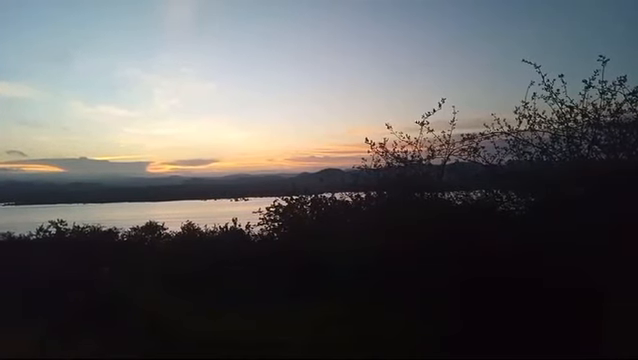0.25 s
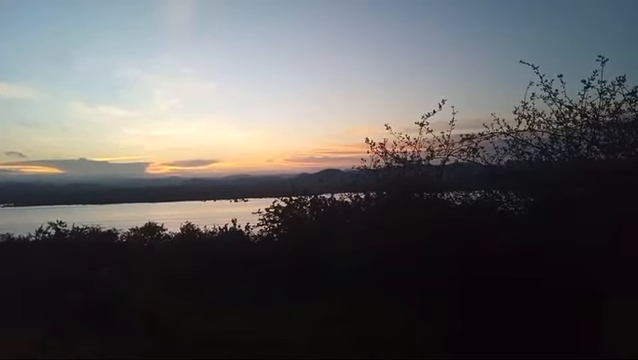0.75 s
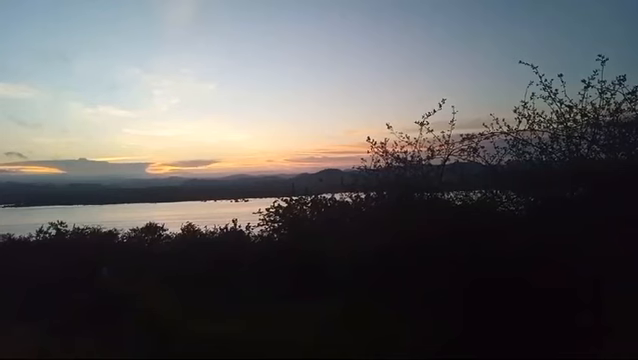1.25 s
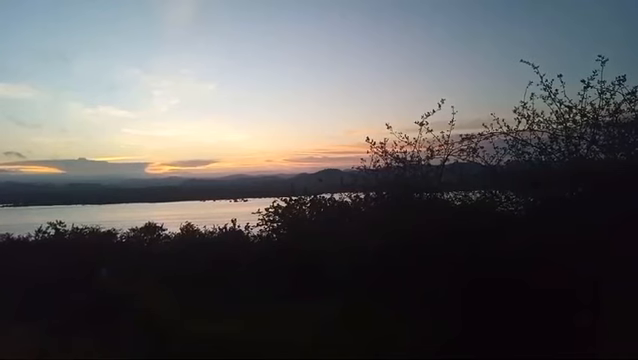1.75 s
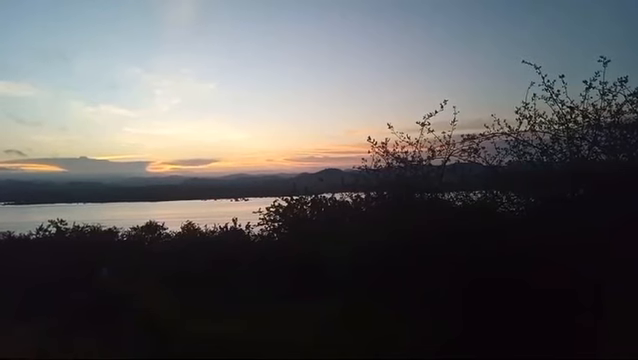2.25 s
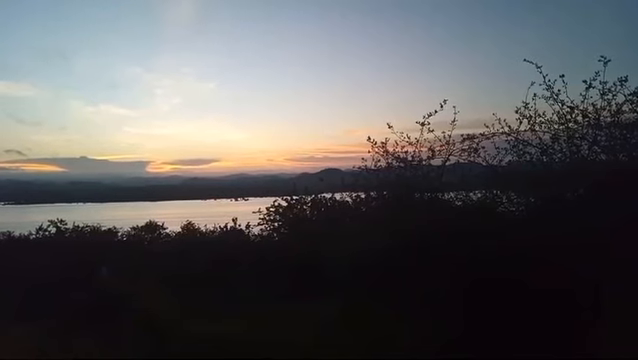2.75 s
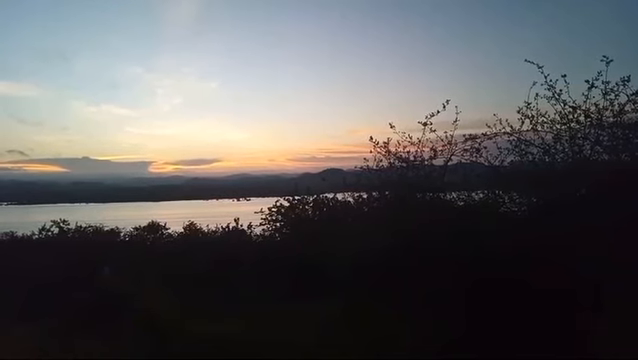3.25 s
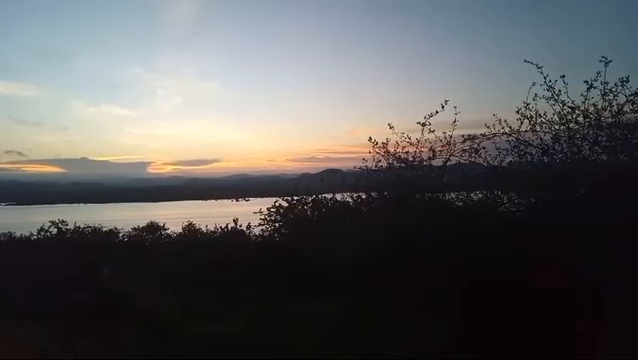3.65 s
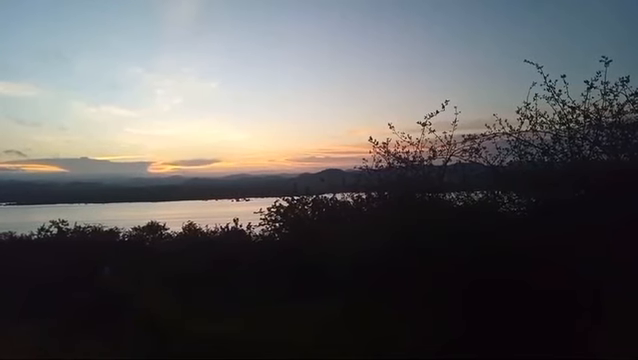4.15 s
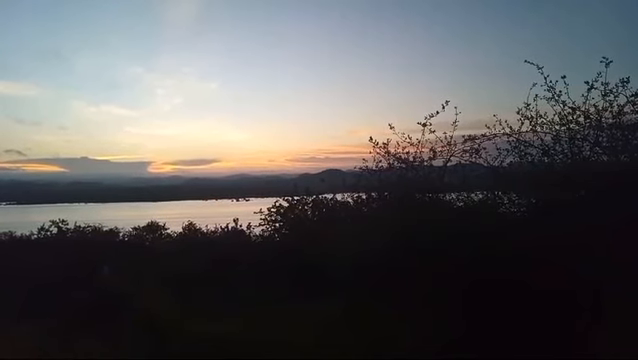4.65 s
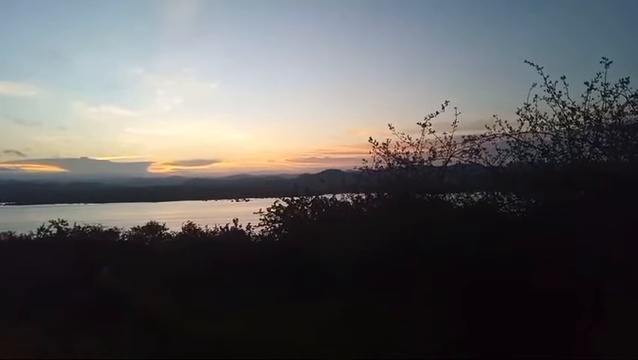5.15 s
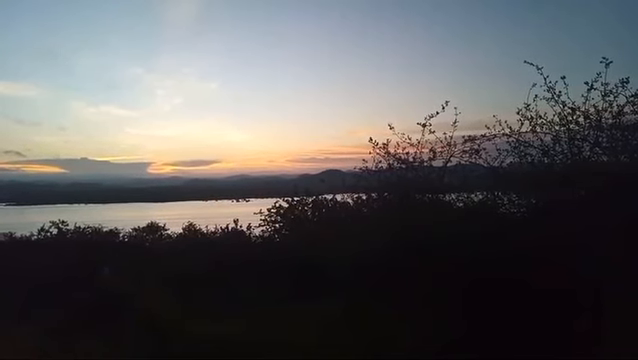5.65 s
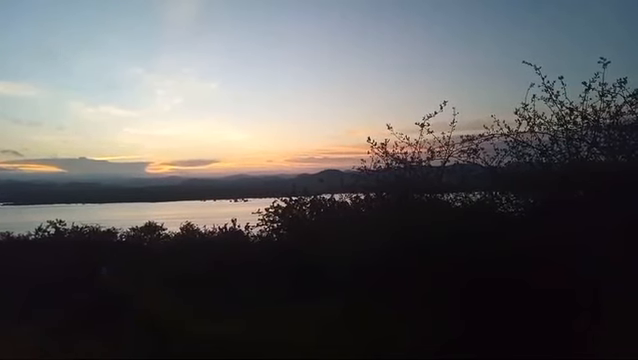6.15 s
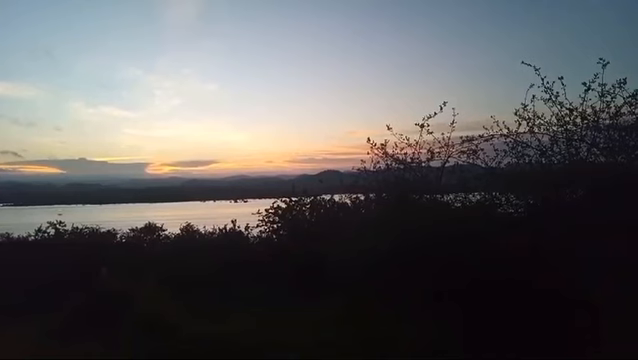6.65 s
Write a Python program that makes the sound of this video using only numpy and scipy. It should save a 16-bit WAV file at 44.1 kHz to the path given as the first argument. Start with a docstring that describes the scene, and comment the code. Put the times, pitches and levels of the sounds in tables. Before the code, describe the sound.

A busy but spacious bird chorus: close liquid whistles, bright rising chirps from bushes, thin high peeps and dry ticks over a faint distant twitter. Early on, a rooster crows roughly, then smoothly downward; another replies very far off around three seconds. Bird phrases continue, growing sparser and quieter toward the end, where a barely audible low hum drifts in. Mono open-air sound with woodland scatter, quiet rumble and small handling bumps.

```python
"""Dawn chorus above a lake: a songbird warbles close by; bush birds answer with slurred whistles and sharp ticks.
A rooster crows, hoarse bursts giving way to a clean falling note; a second one answers from far away.
Birds are gliding sines, roosters summed harmonics, the hoarse one with pulsed noise; trees scatter every call.
Under them lie a faint twitter, rumble and hiss, a thin low hum, puffs of air and soft bumps on the microphone."""
import sys
import numpy as np
from scipy import signal
from scipy.fft import rfft, irfft, next_fast_len
from scipy.io import wavfile
from scipy.ndimage import map_coordinates

SR = 44100
rng = np.random.default_rng(int(sys.argv[2]) if len(sys.argv) > 2 else 0)


def unload_audio(sound):
    """Save the sound as a 16-bit wav file, at the path given as the first command line argument."""
    columns = np.transpose(np.atleast_2d(sound))
    # keep every value between -1 and 1, then stretch to whole-number steps
    steps = np.round(np.clip(columns, -1, 1) * 32767)
    wavfile.write(sys.argv[1], SR, steps.astype(np.int16))


N = 304731
TOP_HZ = 15750  # band limit

# warbler's free song: (time [s], syllable, length [s], reference pitch [Hz], reference level [dB], overtone rms [dB])
WARBLER_SONG = [(0.0, "sag", 0.025, 2900, -33, -64), (0.004, "fall", 0.048, 2510, -40, -68),
                (0.852, "droop", 0.031, 2918, -36, -69), (0.875, "sag", .11, 2233, -42.5, -67.5),
                (1.472, "rise", .05, 2087, -43, -86.5), (1.523, "scoop", 0.055, 3073, -39.5, -84),
                (1.655, "wave", .078, 3408, -35, -73.5), (1.688, "arch", 0.028, 2427, -44, -77),
                (1.724, "arch", .035, 2470, -40, -74), (1.735, "rise", .054, 3435, -32, -67.5),
                (1.769, "rise", 0.041, 3850, -41, -57), (1.786, "droop", .035, 6400, -46, -65),
                (1.835, "rise", .036, 4690, -41, -59), (1.853, "swell", .02, 2900, -40, -64.5),
                (2.456, "sag", 0.021, 5030, -43, -81), (2.483, "flat", 0.033, 2070, -48.5, -93),
                (2.53, "swell", 0.087, 1612, -35, -65), (2.621, "arch", 0.039, 2450, -35, -63),
                (2.647, "bow", 0.061, 2616, -37.5, -72.5), (3.285, "wave", 0.036, 3305, -42, -80.5),
                (3.314, "wave", 0.038, 3317, -35.5, -68.5), (3.343, "arch", .034, 3880, -35.5, -63),
                (3.375, "fall", 0.16, 3327, -37, -63.5), (3.541, "arch", 0.023, 2477, -48.5, -106),
                (4.243, "droop", .049, 5380, -28, -51.5), (4.291, "fall", 0.081, 3780, -36, -62),
                (4.404, "sag", 0.094, 2250, -63.5, -98), (5.096, "plunge", 0.061, 3277, -37, -66.5),
                (5.194, "bow", .173, 2811, -34.5, -67), (5.419, "flat", 0.039, 2376, -52.5, -95),
                (5.467, "sag", 0.024, 2622, -46, -94), (6.213, "arch", 0.041, 2093, -48.5, -94),
                (6.267, "arch", 0.035, 2078, -49, -94), (6.352, "flat", 0.024, 2232, -42, -98),
                (6.382, "sag", 0.063, 1960, -68.5, -99)]
# warbler's refrain: (delay [s], syllable, length [s], reference pitch [Hz])
REFRAIN_NOTES = [(0, "bow", .145, 2482), (.248, "sag", 0.029, 2568), (.284, "arch", .048, 2290),
                 (.376, "plateau", .145, 2111)]
# refrain entries: (time [s], pitch factor, reference level [dB] of each of four notes)
REFRAIN_ENTRIES = [(1.803, 1.03, -47, -42.5, -40.5, -50), (3.612, .975, -51, -59, -53.5, -53.5),
                   (5.537, 1.005, -46, -43.5, -44, -50.5)]
# colour of the warbler's overtones: (frequency [Hz], gain [dB])
BEAK_GAIN = [(3500, -9), (6000, -7.5), (7500, -14), (9000, -4.5), (10700, 4), (13000, -10.5), (15500, -3)]
REFRAIN_OVERTONES_DB = -93


def warbler(fade_s):
    """Pure whistle and, separately, the flickering overtones that a hard-driven syrinx adds."""
    pure, bright = np.zeros(N), np.zeros(N)
    song = [(note(*row), overtone_db) for *row, overtone_db in WARBLER_SONG]
    song += [(sung, REFRAIN_OVERTONES_DB) for sung in phrases(REFRAIN_NOTES, REFRAIN_ENTRIES)]
    for (start_s, length_s, pitches_hz, levels_db), overtone_db in song:
        hz, phase, gain = voiced(length_s, pitches_hz, levels_db, waver=0.012, flutter_db=3.0, fade_s=fade_s)
        overtones = np.zeros(len(hz))
        for k in range(2, 8):
            flicker_db = 5 * wobble(130, size=len(hz))
            colour = amp(along(BEAK_GAIN, k * hz) + flicker_db)
            overtones += colour * (k * hz < TOP_HZ) * np.sin(k * phase)
        add(pure, start_s - fade_s / 2, gain * np.sin(phase))
        add(bright, start_s - fade_s / 2, amp(overtone_db) * unit(np.sqrt(gain) * overtones))
    opening = np.clip(np.arange(N) / SR / .006, 0, 1)  # 6 ms fade-in
    return pure * opening, bright * opening


# bush whistles: (time [s], syllable, length [s], reference pitch [Hz], reference level [dB])
BUSH_WHISTLES = [(0.165, "flat", 0.15, 3530, -75), (1.854, "flat", 0.067, 4670, -44.5),
                 (1.89, "sag", .051, 3880, -59), (1.983, "bow", 0.067, 3730, -52),
                 (2.063, "climb", 0.085, 5794, -45), (2.125, "bow", 0.088, 3784, -54),
                 (2.214, "climb", 0.084, 5750, -39.5), (2.254, "arch", 0.085, 3620, -54),
                 (2.425, "sag", 0.021, 3600, -65), (2.376, "climb", 0.081, 5760, -40.5),
                 (2.482, "arch", .04, 4720, -44.5), (2.534, "climb", .073, 5660, -47.5),
                 (2.564, "arch", 0.077, 3390, -56), (2.657, "sag", .045, 4220, -50.5),
                 (2.679, "flat", 0.039, 4810, -51), (2.742, "lift", 0.025, 5100, -54),
                 (2.944, "lift", .027, 5280, -51.5), (3.303, "arch", .09, 2530, -57.5),
                 (3.523, "droop", 0.026, 4640, -42), (3.551, "flat", 0.017, 3900, -45),
                 (3.569, "droop", 0.043, 4230, -48), (4.032, "flat", 0.19, 3400, -65),
                 (4.122, "lift", 0.065, 5090, -55.5), (4.199, "lift", 0.045, 5750, -50),
                 (4.205, "droop", 0.031, 3290, -58.5), (4.784, "flat", .08, 2320, -72.5),
                 (5.026, "sag", 0.041, 2290, -69), (6.15, "droop", 0.02, 3380, -54.5),
                 (6.405, "droop", 0.038, 2930, -80), (6.798, "arch", 0.097, 3030, -74)]
# two short notes and a long slur: (delay [s], syllable, length [s], reference pitch [Hz])
BUSH_CALL = [(0, "lift", .044, 2925), (.035, "droop", .042, 3807), (.156, "slur", .153, 5290)]
# call entries: (time [s], pitch factor, reference level [dB] of each of three notes)
BUSH_CALL_ENTRIES = [(1.195, 0.96, -60, -53, -40.5), (2.891, 0.98, -51.5, -44.5, -33),
                     (4.897, 0.99, -50, -45, -37.5), (5.412, .972, -51, -47.5, -38)]


def bush_birds():
    """Gliding whistles with a trace of octave, reflected by nearby surfaces."""
    answers = phrases(BUSH_CALL, BUSH_CALL_ENTRIES) + [note(*row) for row in BUSH_WHISTLES]
    calls = whistles(answers, octave_db=-51, waver=0.0065, flutter_db=2.5, fade_s=0.014)
    return echoed(calls, first_db=-20.5, second_db=-25)


# very high whistles: (time [s], syllable, length [s], reference pitch [Hz], reference level [dB])
THIN_WHISTLES = [(0.889, "bend", .12, 7520, -47), (3.894, "lift", 0.017, 7450, -58),
                 (4.173, "arch", 0.11, 7270, -49), (4.259, "lift", 0.11, 7220, -45)]


def thin_birds():
    """Very high glides with a stronger octave."""
    notes = [note(*row) for row in THIN_WHISTLES]
    return whistles(notes, octave_db=-14.5, waver=0.0049, flutter_db=-0.5, fade_s=0.011)


# fast downward sweeps: (time [s], length [s], nominal top pitch [Hz], reference level [dB])
TICK_SWEEPS = [(1.131, 0.018, 5810, -54.5), (1.643, 0.0095, 5950, -46), (2.832, .013, 5900, -43.5),
               (3.742, .013, 6050, -60.5), (3.764, 0.016, 6200, -57), (3.794, 0.012, 6250, -54.5),
               (3.971, .028, 9190, -66), (4.545, 0.03, 9430, -70.5), (4.845, 0.0086, 6150, -44.5),
               (5.348, 0.01, 6060, -49)]
TICK_FALL = 0.669  # last pitch / first pitch


def ticks():
    """Ragged sweeps, so fast that they sound like chips; each swells, then fades as it falls."""
    out = np.zeros(N)
    for start_s, length_s, top_hz, db in TICK_SWEEPS:
        hz, gain = syllable(length_s, [top_hz, top_hz * TICK_FALL], [db - 3, db + 3, db - 7], fade_s=.006)
        ragged = 1 + .035 * wobble(700, size=len(hz))
        add(out, start_s, gain * np.sin(turning(hz * ragged)))
    return out


# crow: (time [s], mean pitch [Hz], hoarseness [0 clean, about 1 hoarse])
CROW_PITCH = [(.3, 656.5, 1.08), (.4, 635.5, 0.56), (.53, 571, 0.65), (.585, 682.2, 0.36), (.65, 753, 0.03),
              (.72, 637.4, 0.52), (.78, 638, 0.82), (.84, 706, 0.22), (1.0, 689.2, 0.17),
              (1.06, 666.6, 0.63), (1.21, 639.8, 0.88), (1.28, 658.3, .14), (1.48, 702.7, 0.02),
              (1.72, 696, .05), (2.0, 652.3, .06), (2.36, 636.6, 0.01), (2.47, 591.4, 0.21)]
# low harmonics: (time [s], fundamental level [dB], second-harmonic level [dB])
CROW_LOW_LEVEL = [(.298, -83, -62), (.41, -46, -44.5), (.56, -73, -64.5), (.578, -44, -40.5),
                  (.658, -61, -60), (.68, -42.5, -37), (.755, -59.5, -75), (.785, -44, -40.5),
                  (.87, -53, -49.5), (1.0, -43.5, -42.5), (1.16, -69.5, -52.5), (1.2, -48.5, -45),
                  (1.33, -56.5, -48), (1.61, -50.5, -42), (1.85, -63, -59), (2.04, -69, -46.5),
                  (2.22, -72, -44.5), (2.29, -59, -57), (2.38, -59.5, -39), (2.5, -79, -72.5)]
# upper harmonics before the throat: (time [s], level [dB])
CROW_UPPER_LEVEL = [(.3, -71), (.308, -59.5), (.42, -58), (.555, -65), (.574, -53.5), (.7, -51), (.75, -55),
                    (.79, -54.5), (1.08, -51), (1.17, -60.5), (1.25, -50), (1.7, -77.5), (2.05, -60),
                    (2.46, -54.5), (2.5, -76)]
# throat resonances: (frequency [Hz], gain [dB])
THROAT_GAIN = [(600, -28), (1000, -8), (1400, -13), (1950, 9), (2400, -25.5), (2800, 1), (3300, -36),
               (4000, -8.5), (4650, -5.5), (5300, -12), (6500, -27), (8000, -48), (10000, -32.5),
               (13000, -42)]
# air torn by the hoarse voice: (frequency [Hz], relative level [dB])
RASP_SPECTRUM = [(420, -40), (580, -20), (820, -16), (1100, 8.5), (1550, 4), (1950, -8), (2350, -39),
                 (3400, -13), (4700, -8), (7000, -47)]


def rooster():
    """Harmonic voice; hoarseness scatters cycles, adds half-pitch vibration and rasps air in each cycle."""
    hz, hoarse = curves(CROW_PITCH)
    first_db, second_db = curves(CROW_LOW_LEVEL)
    upper_db, = curves(CROW_UPPER_LEVEL)
    scatter = hoarse ** .7 * (.052 * wobble(330) + .032 * wobble(70))
    phase = turning(hz * (1 + scatter + 0.0017 * wobble(39.34)))
    half_pitch = wobble(70) * np.sin(phase / 2)
    shake = 1 + hoarse * (0.17 * wobble(300) + 0.31 * half_pitch)
    low = amp(first_db) * np.sin(phase) + amp(second_db) * np.sin(2 * phase)
    buzz = sum(np.sin(k * phase) for k in range(3, 21))
    pulsing = amp(3.3 * np.sqrt(np.abs(hoarse)) * wobble(60) - 2 * hoarse)
    upper = filtered(amp(upper_db) * buzz * shake * pulsing, lambda f_hz: amp(along(THROAT_GAIN, f_hz)))
    rasp = amp(upper_db - 2.5) * hoarse * pulsing * (1 + np.cos(phase)) * noise(RASP_SPECTRUM)
    voice = (low * shake + upper + rasp) * during(CROW_LOW_LEVEL)
    # the voice is cut off below about 500 Hz
    return filtered(voice, lambda f_hz: 1 - 1 / (1 + (f_hz / 500) ** 12))


# far rooster: (time [s], mean fundamental [Hz], second-harmonic level [dB])
FAR_CROW_CURVE = [(2.8, 377, -94), (2.9, 403, -61), (2.99, 400, -89), (3.06, 417.7, -65), (3.2, 393, -64),
                  (3.35, 395.4, -68.5), (3.46, 395, -85)]


def far_rooster():
    """Only the second and third harmonics carry this far."""
    hz, db = curves(FAR_CROW_CURVE)
    phase = turning(hz * (1 + 0.012 * wobble(70)))
    harmonics = np.sin(2 * phase) + amp(-16.5) * np.sin(3 * phase)
    return amp(db) * during(FAR_CROW_CURVE) * harmonics


def distant_birds(count=260):
    """Many far chirps that melt into a thin twitter."""
    out = np.zeros(N)
    for when, long, high, bend, slope, loud in rng.random((count, 6)):
        if high > 1 / 8:
            hz = 5000 * 2 ** (.36 * (high - .5))
        else:
            hz = 2200 * 2 ** (4 * high)
        pitches_hz = [hz, hz * (1 + 0.11 * (bend - .5)), hz * (1 + 0.36 * (slope - .6))]
        track_hz, gain = syllable(0.076 + 0.068 * long, pitches_hz, [-6, 0, -6], fade_s=0.0094)
        add(out, when * N / SR, amp(-93.5 + 6 * loud) * gain * np.sin(turning(track_hz)))
    return out


# open-country noise: (frequency [Hz], relative density [dB per Hz])
AIR_SPECTRUM = [(15, -96), (25, -30.5), (122, -2.5), (152, -12), (281, -16.5), (322, -16.5), (457, -19.5),
                (495, -22), (666, -20.5), (848, -28.5), (1340, -28.5), (3340, -28.5), (5580, -27),
                (8350, -50), (12500, -42), (15500, -37)]
# thin, distant hum: (time [s], mean pitch [Hz], level [dB])
HUM_CURVE = [(5.7, 447, -105), (6.05, 445, -76.5), (6.4, 452.8, -77.5), (6.7, 458, -88), (6.9, 470, -68.5)]


def background():
    """Coloured-noise rumble and hiss of open country, plus a thin wavering sine hum that drifts in."""
    hz, db = curves(HUM_CURVE)
    hum = amp(db) * np.sin(turning(hz * (1 + 0.0048 * wobble(40))))
    return amp(-71.5 + 0.41 * wobble(10.0)) * noise(AIR_SPECTRUM) + hum


# air on the microphone: (time [s], Gaussian width [s], peak level [dB])
AIR_PUFFS = [(.1, 0.091, -66.5), (.48, 0.0084, -63), (0.664, .025, -44.5), (0.876, 0.018, -51.5),
             (.98, 0.062, -64.5), (1.42, 0.039, -64.5)]
# handling bumps: (time [s], Gaussian width [s], frequency [Hz], peak level [dB])
HANDLING_BUMPS = [(3.721, 0.0017, 300, -52), (3.75, 0.11, 106.8, -62.5), (3.899, 0.0033, 262, -43)]


def microphone():
    """Puffs as Gaussian-swelled low noise; soft handling bumps as Gaussian cosine bursts."""
    t = np.arange(N) / SR
    air = noise([(20, -72), (45, 2.0), (68, 6), (115, -5), (170, -18), (400, -64), (1500, -109)])
    swell, bumps = np.zeros(N), np.zeros(N)
    for centre_s, width_s, db in AIR_PUFFS:
        swell += amp(db) * np.exp(-((t - centre_s) / width_s) ** 2)
    for centre_s, width_s, hz, db in HANDLING_BUMPS:
        envelope = amp(db) * np.exp(-((t - centre_s) / width_s) ** 2)
        bumps -= envelope * np.cos(2 * np.pi * hz * (t - centre_s))
    return swell * air + bumps


# tree reverberation: (frequency [Hz], t60 [s])
TREE_T60 = [(500, 0.37), (2000, 0.25), (5000, 0.24), (8000, 0.26), (14000, 0.13)]


def trees(x, wet_db, build_s):
    """Trunks and leaves scatter a call in clumps of echoes; each stretch of song finds its own paths."""
    out, t = np.zeros(N), np.arange(N) / SR
    half_s = 1 / 3  # stretches overlap by half
    for centre_s in np.arange(0, N / SR + half_s, half_s):
        paths = rng.standard_normal(SR // 2) * amp(3.3 * wobble(240, size=SR // 2))
        hz, age_s, bands = signal.stft(paths, SR, nperseg=256)
        decay = amp(-60 * age_s / along(TREE_T60, hz)[:, None])
        onset = 1 - np.exp(-age_s / build_s)
        tail = signal.istft(bands * decay * onset, SR, nperseg=256)[1]
        inside = np.flatnonzero(abs(t - centre_s) < half_s)
        if len(inside):
            part = x[inside] * np.cos(np.pi * 3 / 2 * (t[inside] - centre_s))
            add(out, t[inside[0]], signal.fftconvolve(part, tail / np.linalg.norm(tail)))
    return x + amp(wet_db) * out


def echoed(x, first_db, second_db):
    """Two distinct echoes from nearby surfaces."""
    out = x.copy()
    add(out, .0165, amp(first_db) * x)
    add(out, .037, amp(second_db) * x)
    return out


def whistles(notes, octave_db, waver, flutter_db, fade_s):
    """Unsteady sine glides with an added octave."""
    out = np.zeros(N)
    for start_s, length_s, pitches_hz, levels_db in notes:
        hz, phase, gain = voiced(length_s, pitches_hz, levels_db, waver, flutter_db, fade_s)
        add(out, start_s - fade_s / 2, gain * (np.sin(phase) + amp(octave_db) * np.sin(2 * phase)))
    return out


def phrases(motif, entries):
    """The notes of a motif, each time that it is sung."""
    notes = []
    for start_s, factor, *levels_db in entries:
        for (delay_s, shape, length_s, hz), db in zip(motif, levels_db):
            notes.append(note(start_s + delay_s, shape, length_s, hz * factor, db))
    return notes


# syllables, name: (pitch points [share of reference pitch], level points [dB re reference]), evenly spaced
SYLLABLE_SHAPES = {"arch": ([.87, 0.97, 0.96, .82], [-9, 0, -13]), "flat": ([1, 1, 0.99, .94],
                   [-15, 0, -5.5]), "bow": ([.55, .85, 0.97, .96, .77, .54], [-24, -4, 1, -3.5, -25.5]),
                   "plateau": ([0.94, 0.96, 1, 0.96, 0.85], [-20, 0.031, 0, -2.2, -23]),
                   "wave": ([.94, 0.97, 0.94, .91, .92], [-8.5, 0, -1.1]), "droop": ([0.96, 0.99, .89, .73],
                   [-3.5, 0, -9.5]), "sag": ([0.96, .93, .83, 0.709], [0, 0.61, -12.5]),
                   "fall": ([0.98, .8, .67, 0.534], [0, -4, -18]), "plunge": ([0.95, .75, 0.62, .46],
                   [-1, 0, -13.5]), "bend": ([.93, .918, 0.97, 1], [-7.5, 0, -7]),
                   "scoop": ([0.95, 0.87, .72, 0.76], [-13, 0, -9.5]), "rise": ([1, 1.13, 1.38, 1.75],
                   [-5.5, 0, -18]), "swell": ([1, 1.18, 1.36, 1.58], [-11.5, -9.5, 0]),
                   "lift": ([.88, .95, 1, 1.04], [-7, 0, -4]), "climb": ([.845, .93, 1, 0.88],
                   [-14.5, 0, -13]), "slur": ([.9, 1, .86, .7, .575, .58], [-11.5, -2, -8, -17.5, -13.5])}


def note(start_s, shape, length_s, hz, db):
    """A placed syllable: (time [s], length [s], pitches [Hz], levels [dB])."""
    shares, levels_db = SYLLABLE_SHAPES[shape]
    return start_s, length_s, hz * np.array(shares), db + np.array(levels_db)


def voiced(length_s, pitches_hz, levels_db, waver, flutter_db, fade_s):
    """Pitch, phase and gain of one slightly unsteady note."""
    hz, gain = syllable(length_s, pitches_hz, levels_db, fade_s)
    drift = wobble(223.0, size=len(hz))
    flutter = wobble(223.0, size=len(hz))
    return hz, turning(hz * (1 + waver * drift)), gain * amp(flutter_db * flutter)


def syllable(length_s, pitches_hz, levels_db, fade_s):
    """Polynomial pitch and gain of one glide, with fades centred on its nominal ends."""
    t = np.arange(-fade_s / 2, length_s + fade_s / 2, 1 / SR)
    u = np.clip(t / length_s, 0, 1)
    pitch_u = np.linspace(0, 1, len(pitches_hz))
    hz = np.polyval(np.polyfit(pitch_u, pitches_hz, len(pitches_hz) - 1), u)
    edge = np.sin(np.pi / 2 * np.clip(np.minimum(t - t[0], t[-1] - t) / fade_s, 0, 1)) ** 2
    return hz, edge * amp(np.interp(u, np.linspace(0, 1, len(levels_db)), levels_db))


def amp(db):
    """Decibels to gain."""
    return 10 ** (np.asarray(db) / 20)


def unit(x):
    """Scaled to rms 1."""
    return x / np.sqrt(np.mean(x ** 2) + 1e-20)


def along(points, hz):
    """Interpolate (frequency [Hz], value) points on a log axis."""
    f_hz, value = np.transpose(points)
    return np.interp(np.log(hz + 1), np.log(f_hz + 1), value)


def curves(rows):
    """One value per sample for each column after the time."""
    time_s, *columns = np.transpose(rows)
    return [np.interp(np.arange(N) / SR, time_s, column) for column in columns]


def during(rows):
    """1 while a curve lasts, with 10 ms fades."""
    t = np.arange(N) / SR
    return np.clip(np.minimum(t - rows[0][0], rows[-1][0] - t) * 100, 0, 1)


def wobble(rate_hz, size=N):
    """Smooth random curve through rate_hz knots a second."""
    knots = rng.standard_normal(int(size * rate_hz / SR) + 4)
    return map_coordinates(knots, [np.arange(size) * rate_hz / SR])


def filtered(x, response):
    """x shaped by a response of frequency [Hz]."""
    m = next_fast_len(N + SR // 2)
    return irfft(rfft(x, m) * response(np.fft.rfftfreq(m, 1 / SR)), m)[:N]


def noise(spectrum):
    """Coloured noise of rms 1."""
    return unit(filtered(rng.standard_normal(N), lambda hz: amp(along(spectrum, hz))))


def turning(hz):
    """Phase [rad] of a pitch curve."""
    return 2 * np.pi * np.cumsum(hz) / SR


def add(track, start_s, sound):
    """Mix a sound into a track, cut at the track's ends."""
    i = round(start_s * SR)
    part = sound[max(-i, 0):max(N - i, 0)]
    track[max(i, 0):max(i, 0) + len(part)] += part


def scene():
    """Each source with its own share of tree scatter, summed to mono."""
    pure, bright = warbler(fade_s=0.0077)
    near = trees(pure, wet_db=-7, build_s=0.00057) + trees(bright, wet_db=-5.0, build_s=0.0018)
    bushes = trees(bush_birds(), wet_db=-4, build_s=.006)
    high = trees(thin_birds(), wet_db=-2.0, build_s=0.007)
    chips = echoed(ticks(), first_db=-2, second_db=-10)
    chips = amp(4.5) * trees(chips, wet_db=-1.0, build_s=0.0016)
    crow = trees(rooster(), wet_db=-4.5, build_s=0.0033)
    far_crow = trees(far_rooster(), wet_db=-6.0, build_s=0.0073)
    chorus = trees(distant_birds(), wet_db=13.5, build_s=0.014)
    return (near + bushes + high + chips + crow + far_crow + chorus + background() + microphone())[None]


def record(dry):
    """The recorder keeps nothing above its band limit."""
    return np.array([filtered(channel, lambda hz: hz < TOP_HZ) for channel in dry])


dry = scene()
out = record(dry)
unload_audio(out)
```